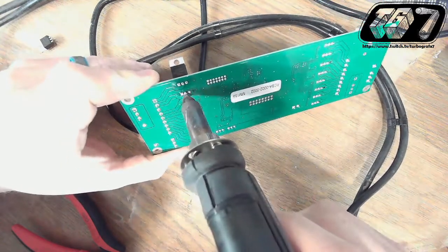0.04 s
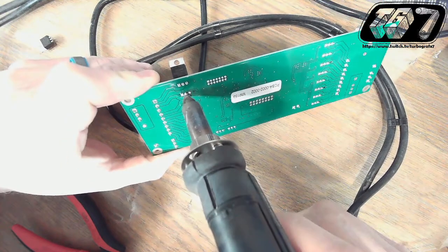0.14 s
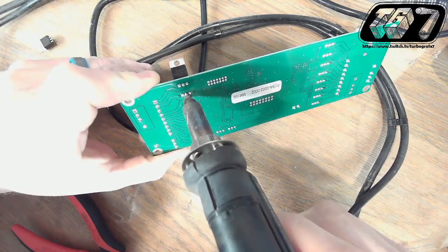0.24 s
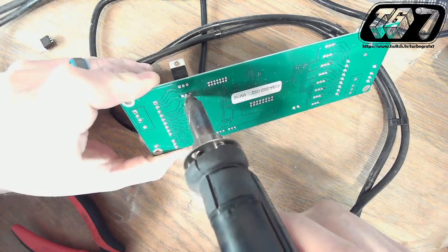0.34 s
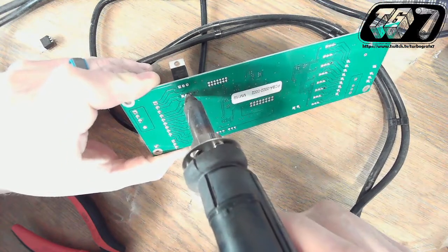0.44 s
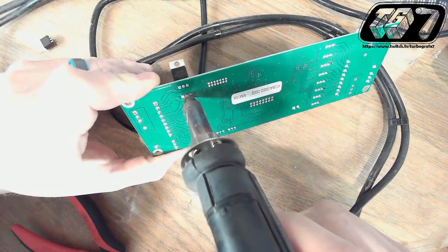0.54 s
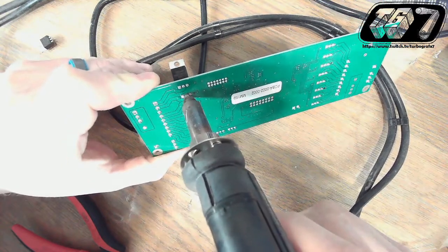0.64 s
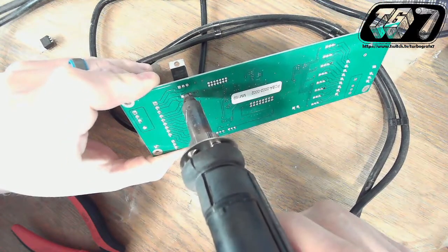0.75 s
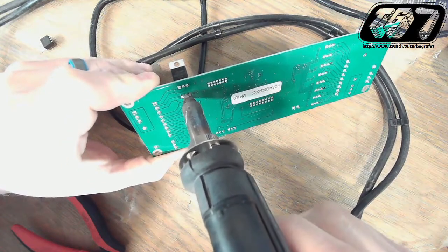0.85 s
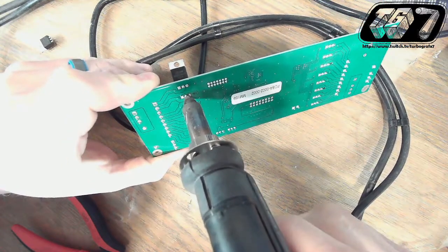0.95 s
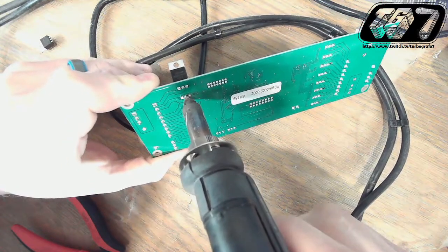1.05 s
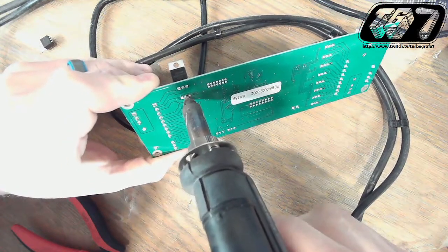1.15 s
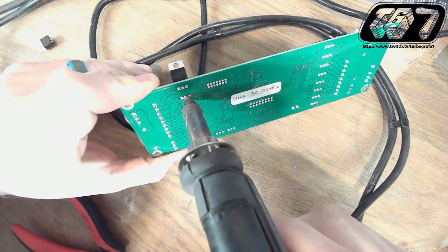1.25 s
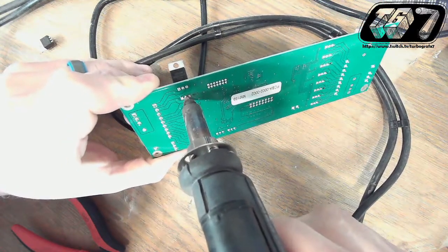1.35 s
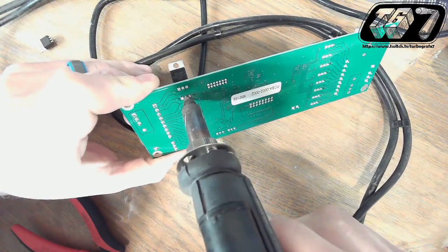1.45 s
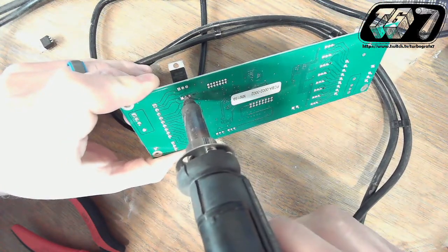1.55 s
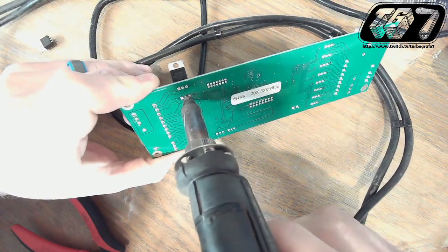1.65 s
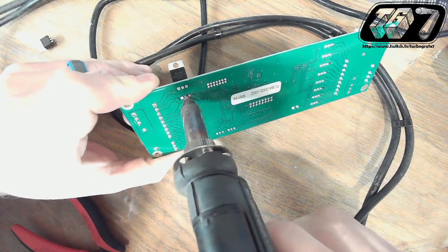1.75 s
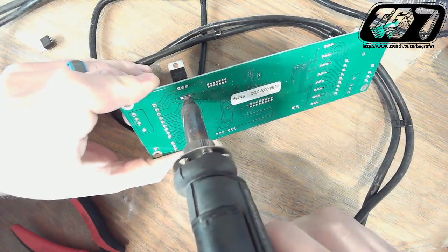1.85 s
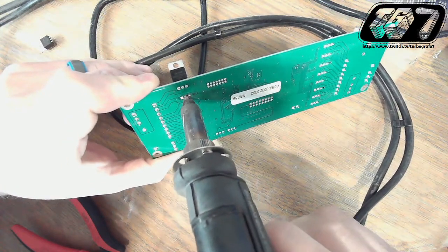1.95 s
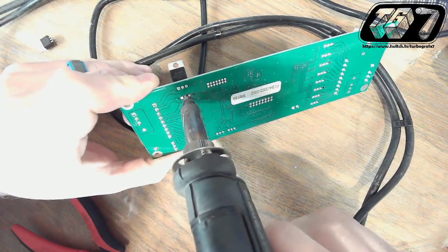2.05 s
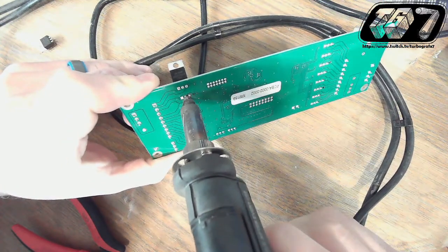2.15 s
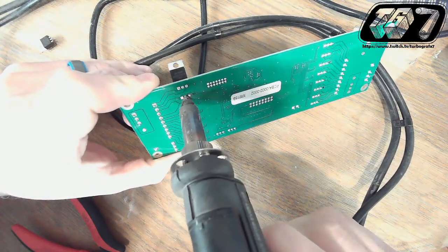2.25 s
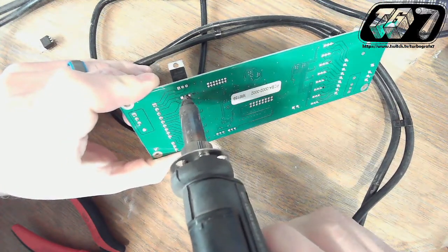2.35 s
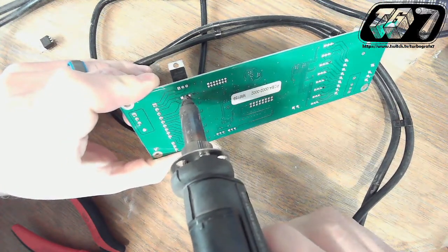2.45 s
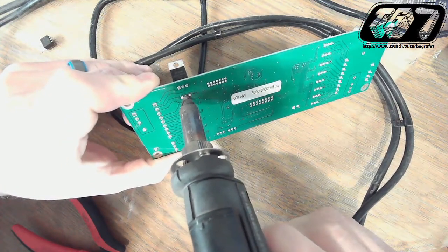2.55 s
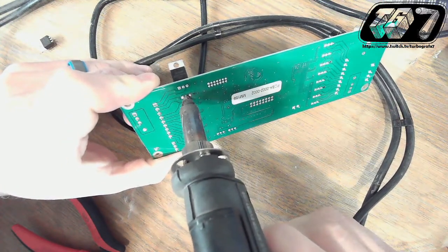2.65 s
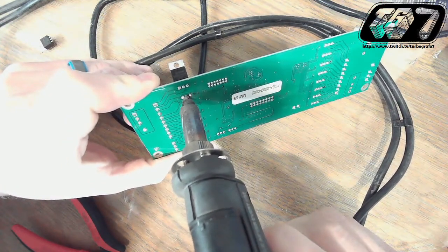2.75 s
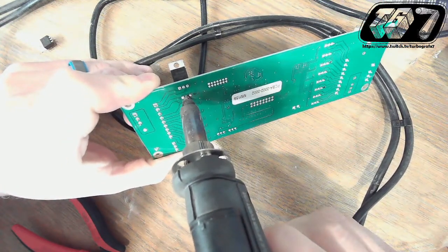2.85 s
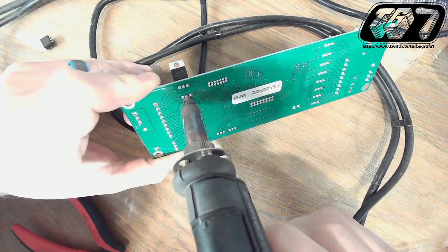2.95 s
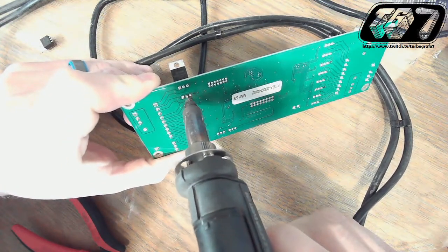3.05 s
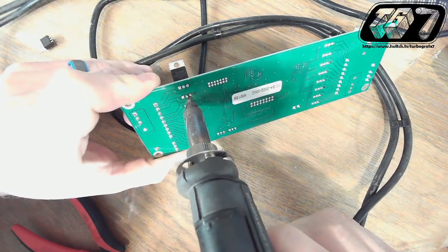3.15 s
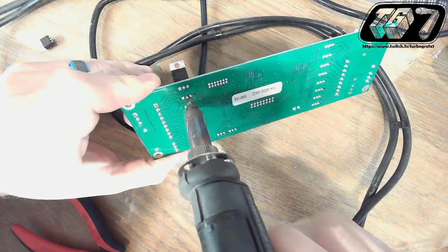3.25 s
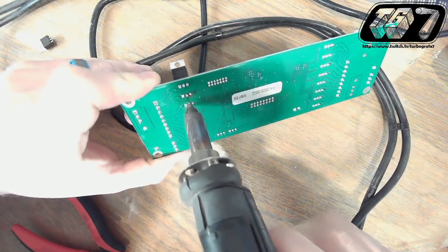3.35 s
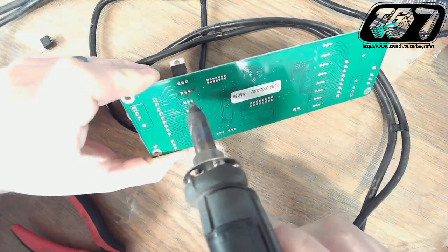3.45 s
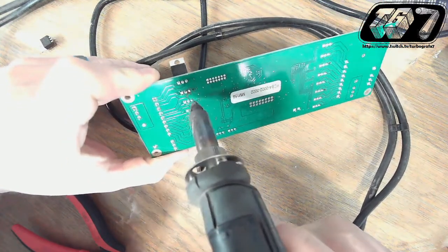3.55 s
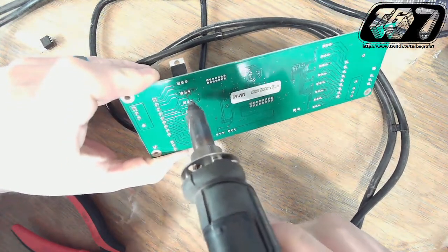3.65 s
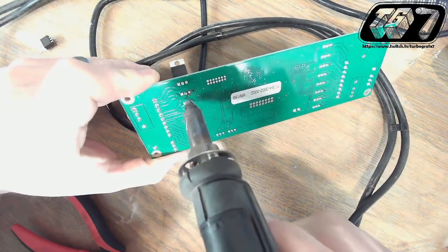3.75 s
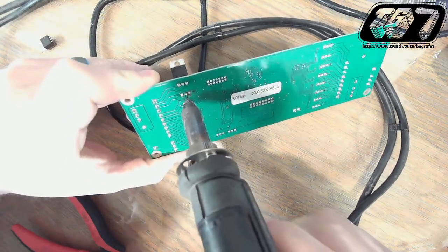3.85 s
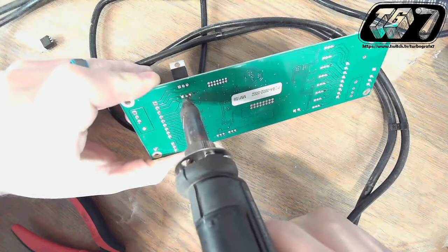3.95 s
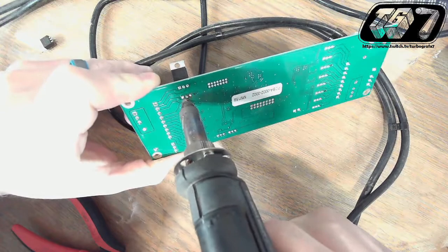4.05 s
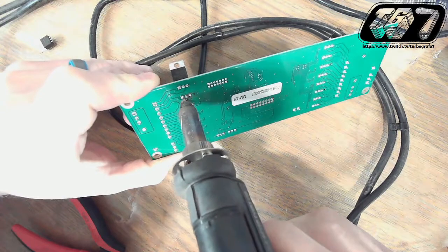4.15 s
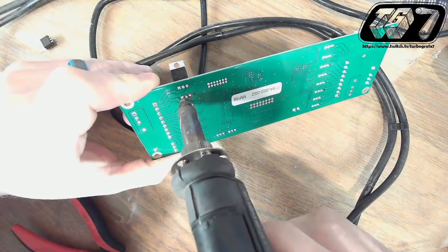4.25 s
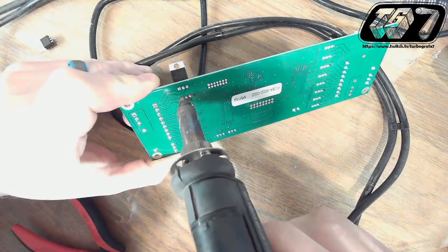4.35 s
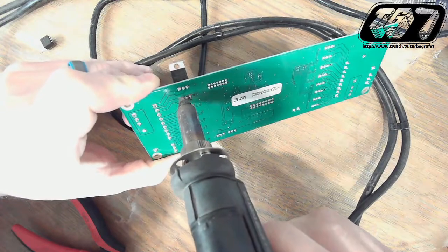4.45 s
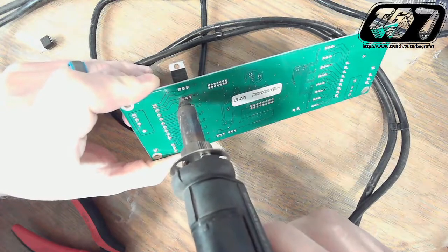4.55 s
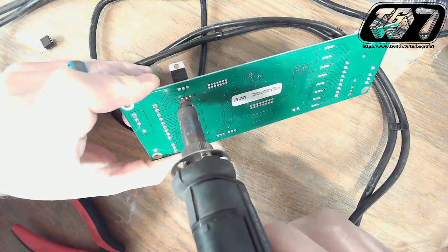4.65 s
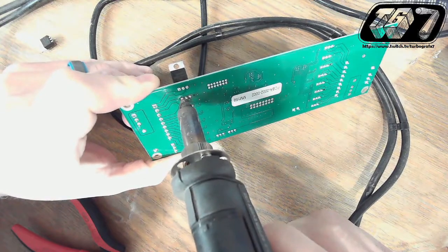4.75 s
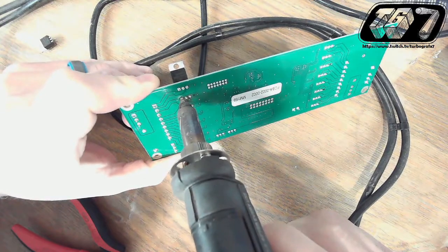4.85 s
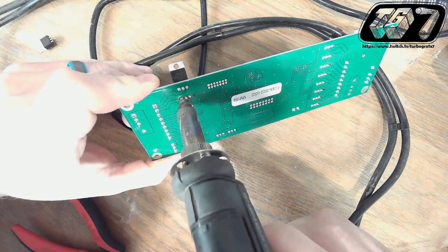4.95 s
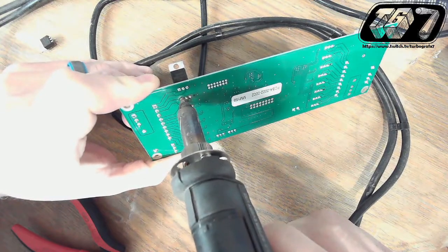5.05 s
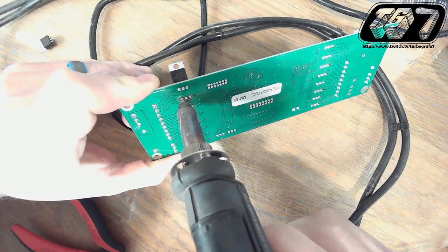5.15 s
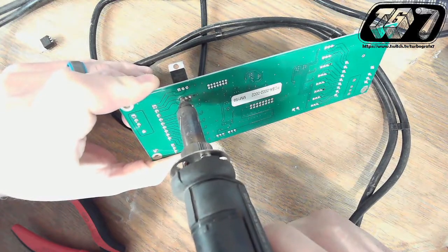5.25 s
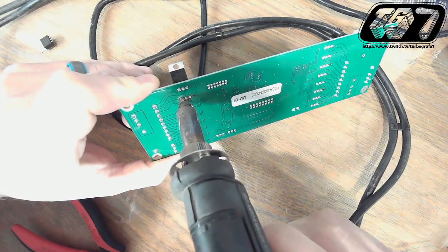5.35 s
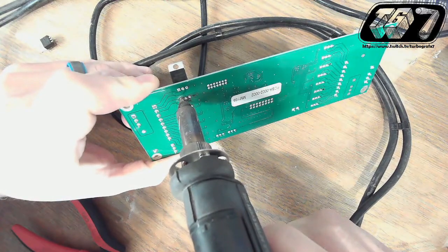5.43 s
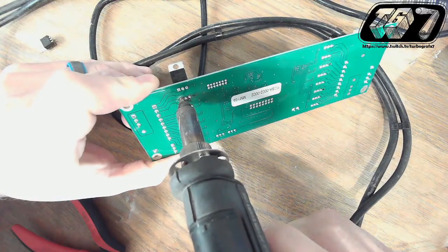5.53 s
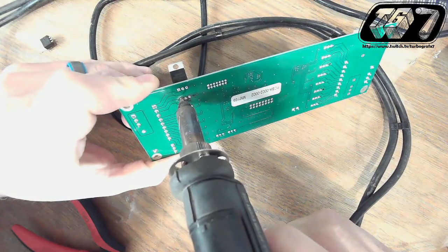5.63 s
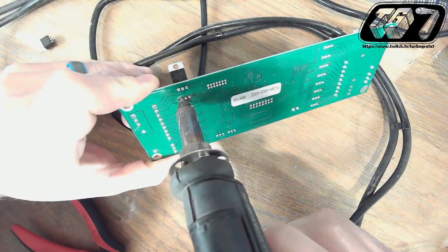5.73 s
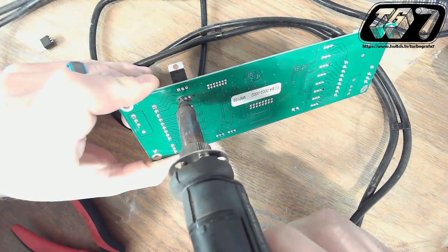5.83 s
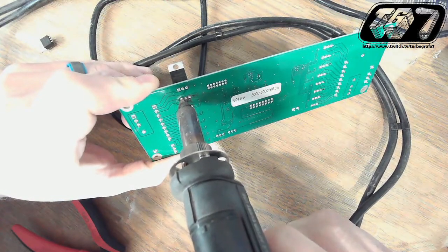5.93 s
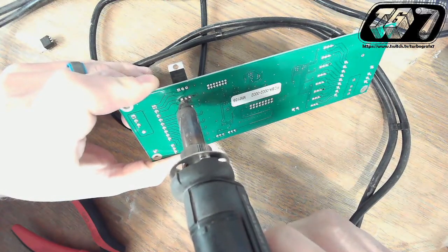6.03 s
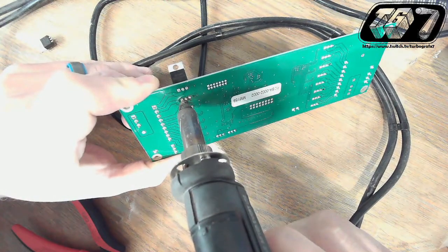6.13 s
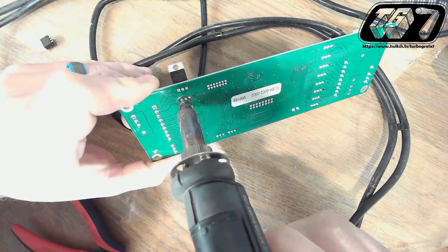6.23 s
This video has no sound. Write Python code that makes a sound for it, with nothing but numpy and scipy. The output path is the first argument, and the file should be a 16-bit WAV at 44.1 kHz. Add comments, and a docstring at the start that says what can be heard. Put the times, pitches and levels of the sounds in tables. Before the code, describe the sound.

In a small quiet room, low hum, distant fan wash and soft rumble. A light tap and trigger click start a desoldering gun's diaphragm pump, a loud rapid buzzing drone with hissing air. A click stops it quickly. After a two-second pause with a faint tap and sizzle, it clicks on again and runs to the end. Close stereo microphone.

```python
"""Hands shift on a board over hum, a distant fan and rumble, and flux sizzles briefly on a hot tip.
After a light tap, the trigger of a desoldering gun clicks and a diaphragm pump spins up: crank harmonics drone,
knocks ring the case, flaps ring the valve head, and noise puffs out each turn, until a click lets it coast to rest.
In the pause come another tap and a longer sizzle, both as decaying sines or shaped noise.
A third click starts the pump again, and it runs to the end."""
import sys
import numpy as np
from scipy import signal
from scipy.fft import rfft, irfft, next_fast_len
from scipy.io import wavfile

SR = 44100
rng = np.random.default_rng(int(sys.argv[2]) if len(sys.argv) > 2 else 0)


def file_out(sig):
    """Save sig as 16-bit WAV at sys.argv[1]."""
    # one column per channel
    cols = np.atleast_2d(sig).T
    # limit, then scale
    lim = np.clip(cols, -1, 1)
    pcm = np.round(lim * 32767).astype(np.int16)
    wavfile.write(sys.argv[1], SR, pcm)


N = 277389
TIME = np.arange(N) / SR

# Runs of the pump. Each row: power on in seconds, power off in seconds, full speed in turns per second.
PUMP_RUNS = [(2.0404, 3.35, 51.25), (5.5381, 7, 51.02)]
# First heavy stroke of each run, as the crank takes up the load. Each row: time in seconds, relative level in dB.
LOAD_STROKES = [(2.08, 7.5), (5.5711, 2)]


def pumping():
    """Superposition: the separate runs of the pump add up."""
    return sum(pump(run, stroke) for run, stroke in zip(PUMP_RUNS, LOAD_STROKES))


RATED_TURNS_PER_S = 51.3
# Strokes and air flow each set in, follow a power of the speed, and die after power off.
FORCE_ATTACK_S, FORCE_POWER, FORCE_RELEASE_S = 0.022, 1, 0.053
FLOW_ATTACK_S, FLOW_POWER, FLOW_RELEASE_S = 0.0087, 2.5, 0.037


def pump(run, first_stroke):
    """Periodic excitation: one crank rotation drives the drone, knocks, flap slaps and air puffs of a run."""
    on_s, off_s, full_speed = run
    turns_per_s = motor(on_s, off_s, full_speed)
    turns = np.cumsum(turns_per_s) / SR
    rate = turns_per_s / RATED_TURNS_PER_S
    force = rate ** FORCE_POWER * envelope(on_s, off_s, FORCE_ATTACK_S, FORCE_RELEASE_S)
    flow = rate ** FLOW_POWER * envelope(on_s, off_s, FLOW_ATTACK_S, FLOW_RELEASE_S)
    # the shaking of the crank grows steeply with its speed
    harmonics = drone(turns, rate, wobble_turns=0.0015, flutter_db=2.25, delay_turns=0.0918, dispersion=0.01803)
    shake = amp(-40.5) * force * rate ** 0.86 * harmonics
    body = shake + case_knocks(turns, force, first_stroke) + housing_rattle(force)
    valves = valve_slaps(turns, force)
    return body * pan(db=-1) + valves * pan(db=-1.5) + exhaust_air(turns, flow)


# The motor kicks off at a share of full speed and closes the gap along an S-curve.
KICK_SHARE, SPIN_UP_S, SPIN_UP_EXPONENT = 0.41, 0.1, 1.7
COAST_S = 0.17  # from power off to rest


def motor(on_s, off_s, full_speed):
    """Rotational inertia: turns per second spin up quickly, hold, then fall ever faster to rest."""
    running = np.maximum(TIME - on_s, 0)
    coasting = np.maximum(TIME - off_s, 0)
    spin_up = 1 - (1 - KICK_SHARE) * np.exp(-(running / SPIN_UP_S) ** SPIN_UP_EXPONENT)
    slowing = np.maximum(1 - (coasting / COAST_S) ** 2, 0)
    return (running > 0) * full_speed * spin_up * slowing


def envelope(on_s, off_s, attack_s, release_s):
    """Transient response: exponential attack, hold, and Gaussian release around one run."""
    attack = 1 - np.exp(-np.maximum(TIME - on_s, 0) / attack_s)
    release = np.exp(-(np.maximum(TIME - off_s, 0) / release_s) ** 2)
    return attack * release


# Drone of the pump. Each row: frequency as a multiple of the rated turn rate, relative level in dB.
CRANK_HARMONICS = [(1, -1.5), (2, -13), (3, -9), (4, 3.5), (5, -11.5), (6, -10), (7, -23.5), (8, -18.5),
                   (9, -37), (10, -10), (11, -7), (12, -39.5), (13, -0.5), (14, -11.5), (15, -26.5),
                   (16, -41.5), (17, -10), (18, -21.5), (19, -14.5), (20, -14), (21, -26), (22, -14.5),
                   (23, -24), (24, -57), (25, -37), (26, -15.5)]


def drone(turns, rate, wobble_turns, flutter_db, delay_turns, dispersion):
    """Fourier series of the crank: the case colours wavering harmonics and spreads them over the turn."""
    knots = np.arange(0, N / SR + 1, 1 / 16)  # seconds between random flutter values
    out, on = np.zeros(N), rate > 0
    shaky = (turns + wobble_turns * drift(30))[on]
    for k, _ in CRANK_HARMONICS:
        # the colour stays fixed in frequency while the harmonic glides with the speed
        db = np.interp(k * rate[on], *np.transpose(CRANK_HARMONICS))
        flutter = np.interp(TIME[on], knots, rng.standard_normal(len(knots)))
        phase_turns = round(k) * (shaky - delay_turns - dispersion * k)
        out[on] += amp(db + flutter_db * flutter) * np.cos(2 * np.pi * phase_turns)
    return out


# Knocks of the crank within a turn. Each row: share of the turn, relative level in dB.
CRANK_KNOCKS = [(0.038, 1.5), (0.26, 3), (0.482, -4), (.63, -11.5), (0.788, -5.5)]
# Modes of the pump case on the bench. Each row: frequency in Hz, relative level in dB, t60 in seconds.
CASE_MODES = [(126, 3.5, 0.11), (178.2, -8.5, .55), (207.2, -23.5, .9), (264, -25, 1.1), (282.3, -23, 1.1),
              (324, -21, 0.62), (380, -8.5, 0.062), (584, -4.5, 0.046), (666, -1, 0.03), (930, -12, 0.024),
              (1022, -5.5, 0.012), (1298, -13.5, 0.023)]


def case_knocks(turns, force, first_stroke):
    """Modal excitation: each knock of the crank sets the modes of the case ringing."""
    knocks = force * blows(turns, CRANK_KNOCKS, scatter_db=2.1, jitter_s=0.00009, limp_db=1.8)
    stroke_s, stroke_db = first_stroke
    knocks[round(stroke_s * SR)] += amp(stroke_db)
    return amp(-43.5) * signal.oaconvolve(knocks, ring(CASE_MODES, size=SR))[:N]


# Spectrum of the air rush, also of the valve cover. Each row: frequency in Hz, relative density in dB per Hz.
AIR_SPECTRUM = [(400, -49), (1200, -12.5), (1820, -1), (2140, -10), (2600, -3.5), (3150, -4.5), (4020, 0.5),
                (4480, 0.5), (6000, -3), (7480, -5), (10200, -15.5), (12000, -23.5), (14200, -41.5),
                (16000, -69.5)]
# Resonances and notches of the exhaust. Each row: frequency in Hz, width in Hz, height in dB.
EXHAUST_PEAKS = [(4150, 300, -10.5), (6600, 307, 1), (7640, 140, -3), (8950, 360, -1.5), (9970, 130, 9)]
# Brief swells of the air rush. Each row: time in seconds, height in dB.
AIR_SURGES = [(2.5, 2), (3.25, 2.5), (5.9, 0)]
SURGE_S = 0.08  # half the length of a swell


def exhaust_air(turns, flow):
    """Turbulent jet noise: the exhaust opens abruptly in mid-turn and empties, modulating the rush of air."""
    surge_db = sum(db * np.exp(-((TIME - s) / SURGE_S) ** 2) for s, db in AIR_SURGES)
    number, cycle = np.divmod(turns + 0.529, 1)
    # each puff has a random strength
    strength = amp(2.7 * np.tanh(rng.standard_normal(400)))[number.astype(int)]
    # opening and emptying are in shares of a turn
    puffs = 1 + 2.5 * strength * (1 - np.exp(-cycle / 0.025)) * np.exp(-cycle / 0.08)
    turbulence = amp(1.2 * drift(250) + 0.7 * drift(12))
    return amp(-47.5) * flow * amp(surge_db) * puffs * turbulence * noise(AIR_SPECTRUM, EXHAUST_PEAKS)


# Slaps of the valve flaps within a turn. Each row: share of the turn, relative level in dB.
FLAP_SLAPS = [(.49, -2), (0.0669, -7), (0.66, -5)]
# Modes of the valve head. Each row: frequency in Hz, relative level in dB, t60 in seconds.
VALVE_MODES = [(2731, -8.5, 0.036), (2787, 6.5, 0.048), (2910, -4, 0.045), (3404, -0.5, 0.044),
               (4340, -2, 0.045), (5820, -8.5, .035), (6800, -8.5, .01), (7900, -28.5, 0.031),
               (9950, -24.5, 0.021)]


def valve_slaps(turns, force):
    """Impulse response: each slap rings the valve head and the countless small modes of its cover alike."""
    slaps = force * blows(turns, FLAP_SLAPS, scatter_db=1.7, jitter_s=0.00005, limp_db=0.8)
    t = TIME[:4096]
    head = ring_at_ports(VALVE_MODES, lag_s=0.00003)
    cover = noise(AIR_SPECTRUM, EXHAUST_PEAKS, size=4096) * amp(-60 * t / 0.036) * (1 - np.exp(-t / 0.00018))
    return signal.oaconvolve(slaps[None], amp(-46.5) * head + amp(-43) * cover, axes=1)[:, :N]


# Rattle of the housing. Each row: frequency in Hz, relative density in dB per Hz.
RATTLE_SPECTRUM = [(30, -29), (70, -2.5), (130, -1), (220, -5.5), (330, -6.5), (440, -19), (620, -11),
                   (800, -11), (1050, -10.5), (1500, -25), (2200, -59), (5000, -82)]


def housing_rattle(force):
    """Random vibration: coloured noise in the housing follows the force of the strokes."""
    return amp(-44.0) * force * noise(RATTLE_SPECTRUM)


# Snaps of the trigger switch. Each row: time in seconds, relative level in dB, contact time in seconds,
# left-right difference in dB, ringing of the switch cap in dB.
SWITCH_SNAPS = [(2.0384, -21, 0.0022, 1, 2.5), (3.349, -20, 0.0028, -1.5, 11.5),
                (5.5384, -23, 0.0028, 3.5, 10)]
# Modes of the gun handle. Each row: frequency in Hz, relative level in dB, t60 in seconds.
HANDLE_MODES = [(1950, -24, 0.013), (2620, -6, 0.02), (3763, 2.5, 0.018), (4340, -6, 0.0164),
                (5460, 3, 0.013), (7330, 1, 0.0067), (8200, 7, 0.011), (9000, 6, 0.014),
                (9700, 1.5, 0.0092), (10060, -18.5, .016)]
# Modes of the switch cap. Each row: frequency in Hz, relative level in dB, t60 in seconds.
CAP_MODES = [(5866, 14.5, 0.01), (6300, -3, 0.014), (6740, 2.5, 0.031)]
# Crack of a click. Each row: frequency in Hz, relative density in dB per Hz.
CRACK_SPECTRUM = [(300, -11), (1600, -19), (2500, -17.5), (6000, 2), (9000, -6), (12000, -13),
                  (16000, -25.5)]
# A click scattered off the board and bench. Each row: frequency in Hz, relative density in dB per Hz.
SCATTER_SPECTRUM = [(300, -20), (1500, -15.5), (2600, -7), (6000, 1), (9500, -6), (12500, -23),
                    (15000, -43)]
# Light taps of the trigger lever and tip. Each row: time in seconds, relative level in dB,
# left-right difference in dB.
LIGHT_TAPS = [(1.8734, -37, -2), (4.268, -58, 13)]
# Modes that the taps ring. Each row: frequency in Hz, relative level in dB, t60 in seconds.
LEVER_MODES = [(1930, -9.5, .02), (2500, -5, 0.014), (3230, -4.5, 0.016), (4940, -7, .012),
               (5770, 1.5, 0.015), (6000, -2, .012), (6700, -3, .012), (7490, -9, .01), (10640, -15, 0.03)]


def clicks():
    """Impact and modal decay: a snap cracks and rings the handle, then the cap; light taps ring the lever."""
    out, t = np.zeros((2, N)), np.arange(4096) / SR
    # the finger damps the ring after a few milliseconds
    damping = 0.2 + 0.8 * np.exp(-(t / 0.005) ** 4)
    for s, db, contact_s, pan_db, cap_db in SWITCH_SNAPS:
        handle = ring_at_ports(HANDLE_MODES, lag_s=0.00004) * (1 - np.exp(-t / 0.00079))
        cap = ring_at_ports(CAP_MODES, lag_s=0.00004) * (1 - np.exp(-(t / contact_s) ** 2))
        modes = (handle + amp(cap_db) * cap) * damping
        crack = noise(CRACK_SPECTRUM, size=4096) * np.exp(-(t / (2 * contact_s)) ** 2)
        scatter = noise(SCATTER_SPECTRUM, size=4096) * (1 - np.exp(-t / 0.0017)) * np.exp(-t / 0.011)
        add(out, s, amp(db) * pan(pan_db) * (modes + amp(-6.5) * crack + amp(-11.0) * scatter))
    for s, db, pan_db in LIGHT_TAPS:
        lever = ring_at_ports(LEVER_MODES, lag_s=0.00003) * (1 - np.exp(-t / 0.0006))
        add(out, s, amp(db) * pan(pan_db) * lever * damping)
    return out


# Flux sizzling at the tip. Each row: start in seconds, length in seconds, level in dB.
FLUX_SIZZLES = [(0.883, 0.095, -76), (4.295, 0.35, -73)]
# Spectrum of a sizzle. Each row: frequency in Hz, relative density in dB per Hz.
SIZZLE_SPECTRUM = [(4000, -28), (6500, 4), (8500, 6), (11000, -1), (15000, -16)]


def sizzles():
    """Boiling noise: flux on the hot tip gives a hiss that swells and fades smoothly."""
    out = np.zeros((2, N))
    for s, length_s, db in FLUX_SIZZLES:
        size = int(length_s * SR)
        add(out, s, amp(db) * signal.windows.hann(size) * noise(SIZZLE_SPECTRUM, size=size))
    return out


# The still room. Each row: frequency in Hz, relative density in dB per Hz.
QUIET_SPECTRUM = [(88, -62.5), (150, -1.5), (193, -1), (359, -7), (436, -12.5), (631, -9.5), (668, -4),
                  (912, -5.5), (1450, -11), (1830, -14), (2360, -11), (2650, -12.5), (3220, -11.5),
                  (5540, -11.5), (15500, -42.5)]
# Resonances of a distant fan. Each row: frequency in Hz, width in Hz, height in dB.
FAN_PEAKS = [(407, 6.7, 7.5), (683, 9.3, 8.5), (877, 17, 5.5), (934, 31, 8.5), (1853, 240, 13.5),
             (2063, 56, 7.5), (2630, 160, 10)]
# Low rumble. Each row: frequency in Hz, relative density in dB per Hz.
RUMBLE_SPECTRUM = [(5, 2.5), (20, 3), (32, -9), (43, 5), (60, -12.5), (90, -9.5), (150, -24), (250, -38),
                   (900, -100)]
# Hands shifting on the board, felt as low bumps. Each row: time in seconds, relative level in dB.
HAND_BUMPS = [(.12, -66), (.62, -66), (1.24, -73), (1.76, -62), (4.33, -58)]


def background():
    """Stationary ambience: transformer hum, a fan's wash, and a rumble that swells when the hands shift."""
    hum = amp(-62.0 + 0.5 * drift(6)) * np.sin(2 * np.pi * 120 * TIME)  # twice the mains frequency
    swell = amp(-61.5) + sum(amp(db) * np.exp(-((TIME - s) / 0.057) ** 2) for s, db in HAND_BUMPS)
    rumble = swell * noise(RUMBLE_SPECTRUM)
    wash = amp(-64.0) * noise(QUIET_SPECTRUM, FAN_PEAKS)
    return hum * pan(db=-1.1) + rumble * pan(db=-8.5) + wash


# Reverberation time of the room. Each row: frequency in Hz, t60 in seconds.
ROOM_T60 = [(150, 0.89), (290, 0.93), (700, 0.16), (6000, 0.22), (14000, 0.029)]


def room(x, early_db):
    """Reverberation: dense early reflections off the bench, then a tail that lasts longest in the bass."""
    taps = rng.standard_normal((2, SR // 2)) * (rng.random((2, SR // 2)) < 1 / 8)
    hz, t, bands = signal.stft(taps, SR, nperseg=256)
    decay = amp(-60 * t / read(ROOM_T60, hz)[:, None])
    tail = signal.istft(bands * decay, SR, nperseg=256)[1]
    t = np.arange(tail.shape[1]) / SR
    tail *= (t > 0.003) * (1 + amp(early_db) * np.exp(-t / 0.012))
    return signal.oaconvolve(x, tail / np.linalg.norm(tail[0]), axes=1)[:, :N]


def blows(turns, pattern, scatter_db, jitter_s, limp_db):
    """Impulse train: blows at nearly fixed places of the turn, stronger on every other turn."""
    out, number = np.zeros(N), np.arange(int(turns[-1]) + 1)
    for share, db in pattern:
        size, late = np.clip(rng.standard_normal((2, len(number))), -1.5, 1.5)
        at = np.searchsorted(turns, number + share) + np.round(late * jitter_s * SR).astype(int)
        strength = amp(db + scatter_db * size + limp_db * (-1) ** number)
        inside = at < N
        np.add.at(out, at[inside], strength[inside])
    return out


def ring(modes, size, lag_s=0):
    """Modal synthesis: exponentially dying sines of a struck body, heard lag_s late."""
    t = np.maximum(np.arange(size) / SR - lag_s, 0)
    return sum(amp(db - 60 * t / t60) * np.sin(2 * np.pi * hz * t) for hz, db, t60 in modes)


def ring_at_ports(modes, lag_s):
    """Interaural-style delay: the left port hears the ring lag_s after the right."""
    return np.array([ring(modes, size=4096, lag_s=lag) for lag in (lag_s, 0)])


# Likeness of the two ports. Each row: frequency in Hz, correlation from 0 to 1.
PORT_LIKENESS = [(60, 1), (300, 0.9), (700, 0.84), (1400, 0.66), (3000, 0.58), (4500, 0.11), (8000, 0.9),
                 (15000, 0.52)]


def noise(spectrum, peaks=(), size=N):
    """Partial coherence: coloured noise of rms 1 overall, shared by the ports more or less with frequency."""
    length = 2 * next_fast_len(size // 2 + 1)
    hz = np.fft.rfftfreq(length, 1 / SR)
    left, other = rfft(rng.standard_normal((2, length)))
    same = np.clip(read(PORT_LIKENESS, hz), -1, 1)
    right = same * left + np.sqrt(1 - same ** 2) * other
    resonance_db = sum(height / (1 + (2 * (hz - f) / width) ** 2) for f, width, height in peaks)
    colour = amp(read(spectrum, hz) + resonance_db)
    return unit(irfft(np.array([left, right]) * colour)[:, :size])


def drift(hz):
    """Band-limited fluctuation: a random wander of rms 1, up to the given rate."""
    length = next_fast_len(N)
    below = np.fft.rfftfreq(length, 1 / SR) < hz
    return unit(irfft(rfft(rng.standard_normal(length)) * below, length)[:N])


def amp(db):
    """Logarithmic level: decibels to gain."""
    return 10 ** (np.asarray(db) / 20)


def unit(x):
    """Root-mean-square level: scales to rms 1."""
    return x / np.sqrt(np.mean(x ** 2) + 1e-20)


def read(points, hz):
    """Logarithmic pitch scale: joins points by straight lines over log frequency."""
    f, value = np.transpose(points)
    return np.interp(np.log(hz + 1), np.log(f + 1), value)


def add(mix, s, sound):
    """Superposition: adds a stereo sound at time s."""
    part = mix[:, round(s * SR):][:, :sound.shape[1]]
    part += sound[:, :part.shape[1]]


def pan(db):
    """Level difference: gains of the two ports for a left-right difference."""
    return amp([[db / 2], [-db / 2]])


def scene():
    """Direct and reverberant field: pump and trigger in a small room, with sizzles and background."""
    pumps = pumping()
    trigger = clicks()
    reflected = room(amp(-26.0) * pumps + amp(-19.0) * trigger, early_db=8.0)
    return pumps + trigger + reflected + sizzles() + background()


EDGE_HZ = 15900  # upper band limit


def record(dry):
    """Linear filtering: a steep low-pass band limit, with a small steady offset at each port."""
    offset = np.array([[-0.005], [-0.0008]])
    low_pass = signal.firwin(511, EDGE_HZ, window=("kaiser", 9), fs=SR)
    return offset + signal.oaconvolve(dry, low_pass[None], "same")


dry = scene()
out = record(dry)
file_out(out)
```